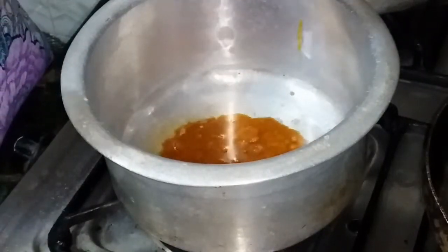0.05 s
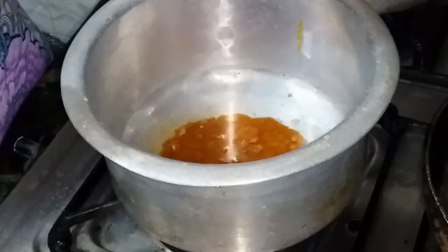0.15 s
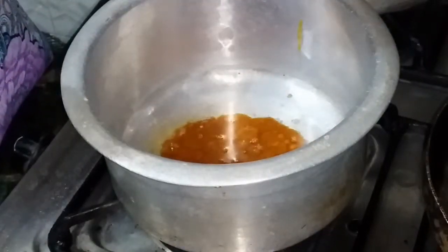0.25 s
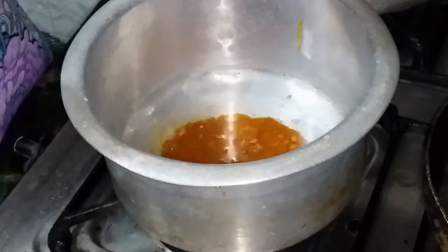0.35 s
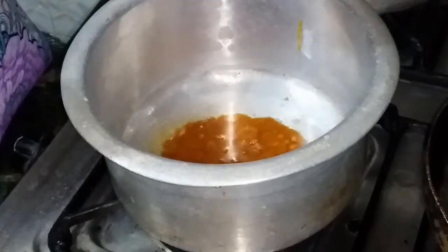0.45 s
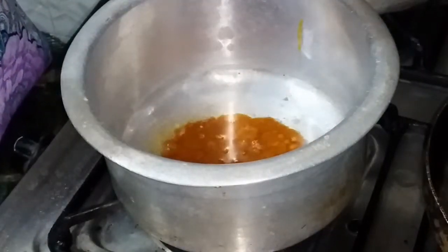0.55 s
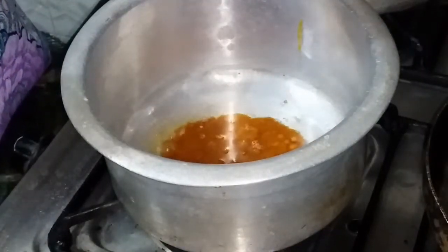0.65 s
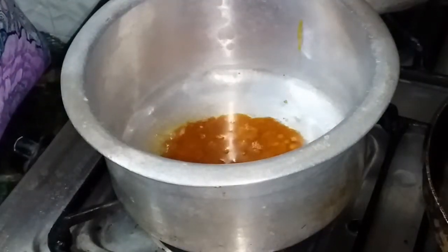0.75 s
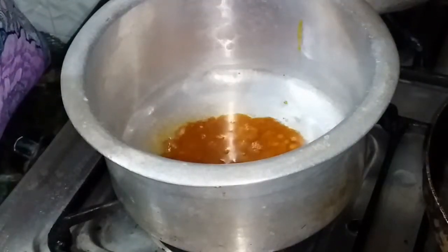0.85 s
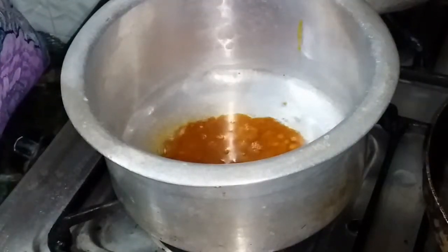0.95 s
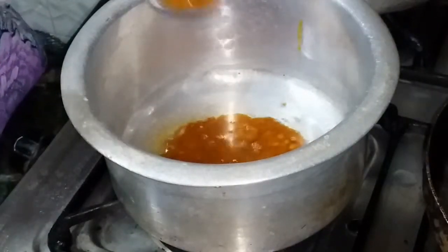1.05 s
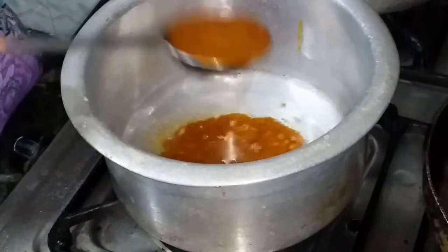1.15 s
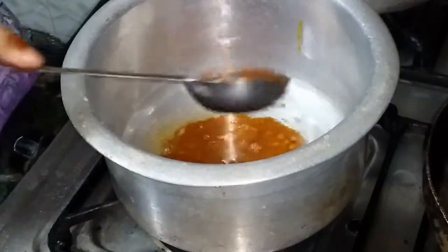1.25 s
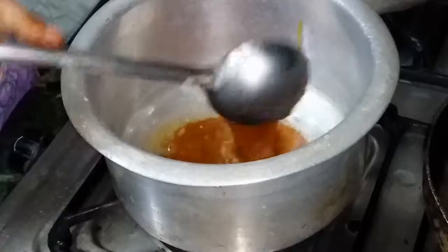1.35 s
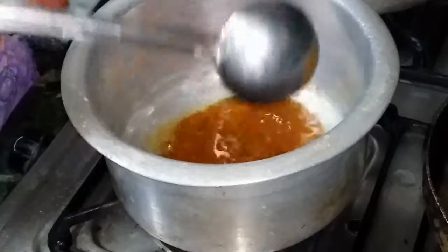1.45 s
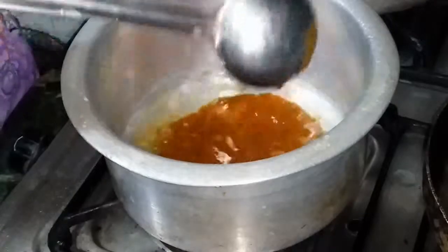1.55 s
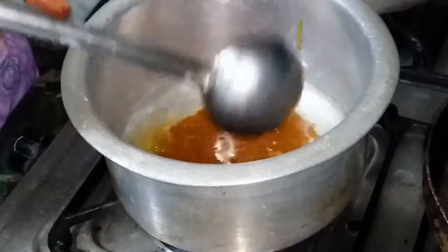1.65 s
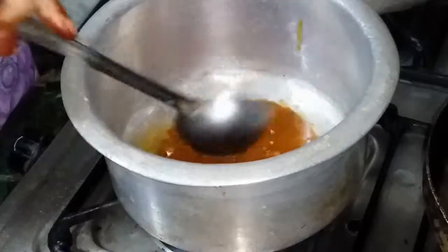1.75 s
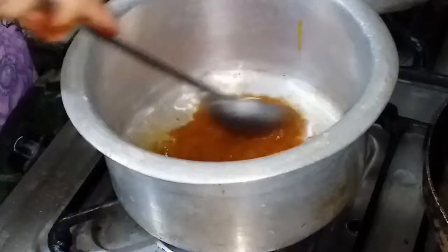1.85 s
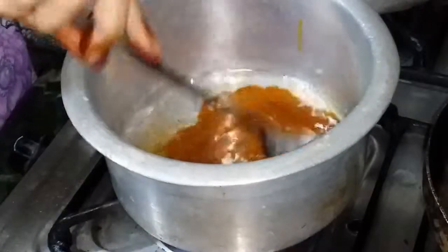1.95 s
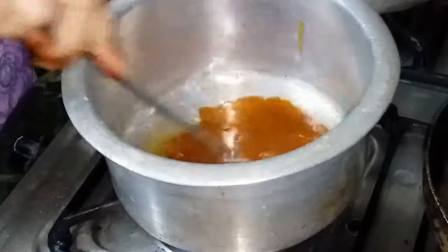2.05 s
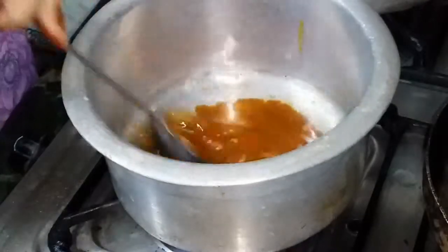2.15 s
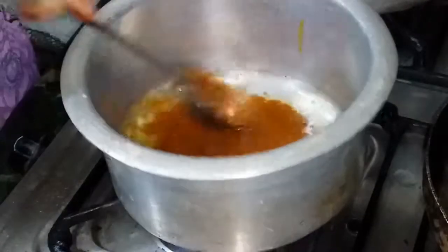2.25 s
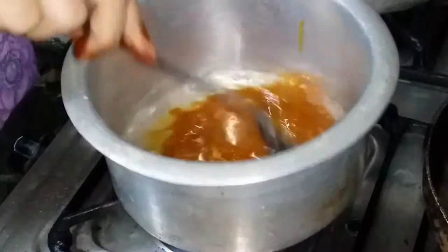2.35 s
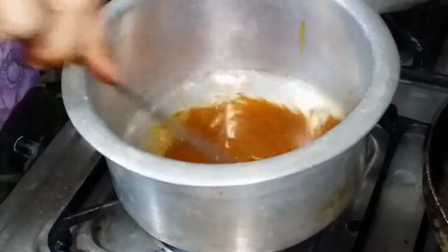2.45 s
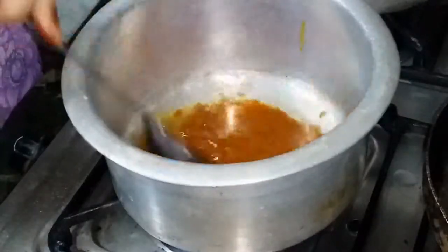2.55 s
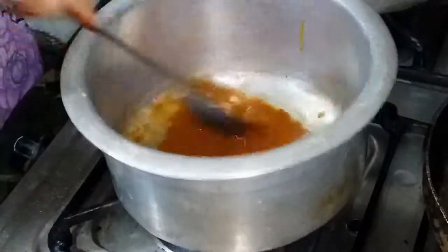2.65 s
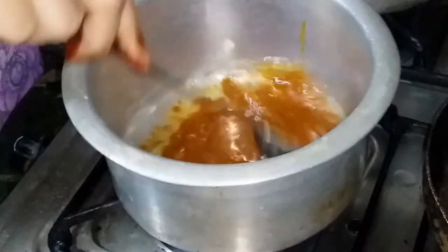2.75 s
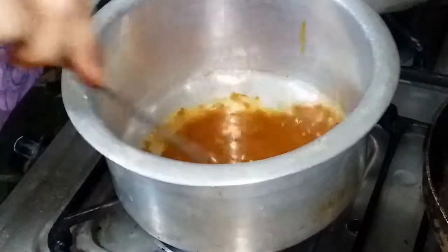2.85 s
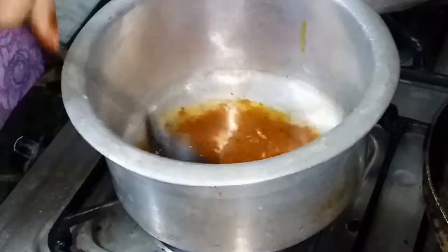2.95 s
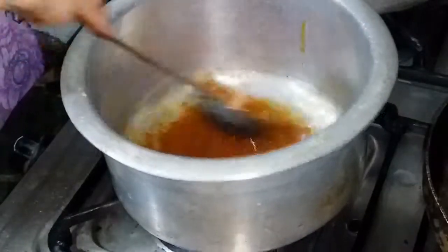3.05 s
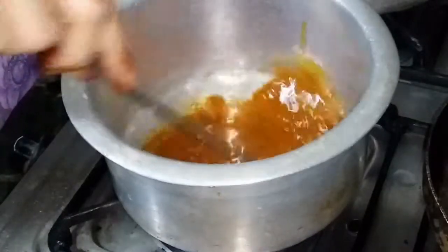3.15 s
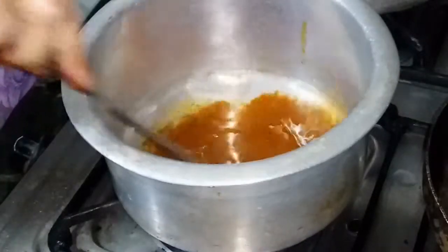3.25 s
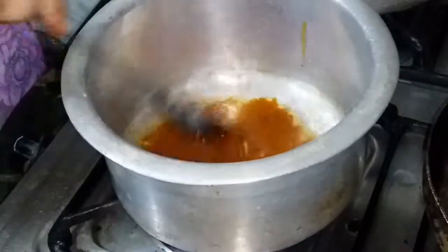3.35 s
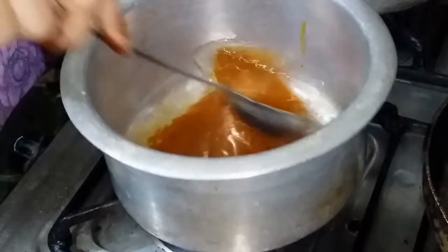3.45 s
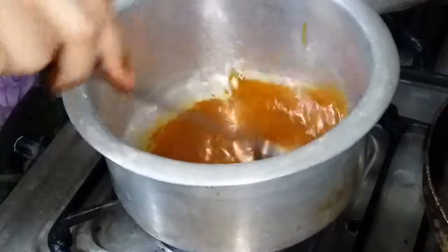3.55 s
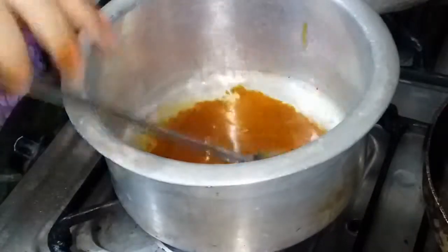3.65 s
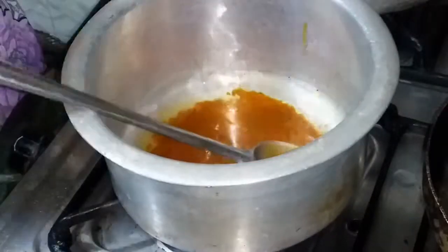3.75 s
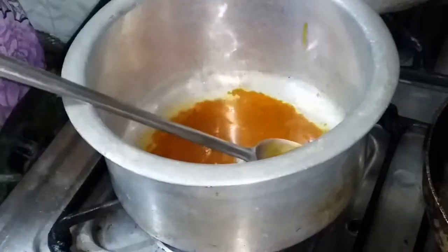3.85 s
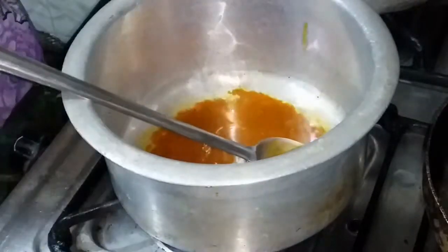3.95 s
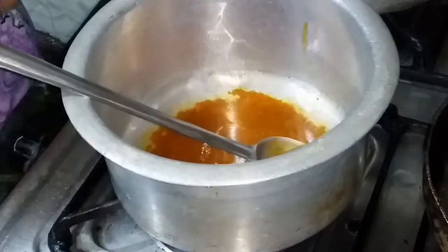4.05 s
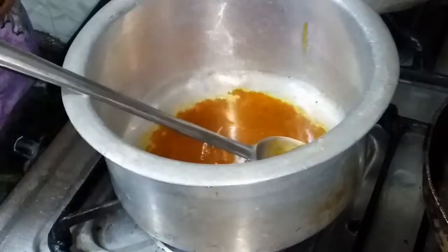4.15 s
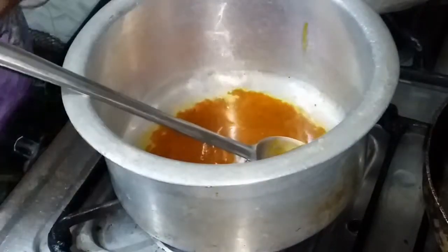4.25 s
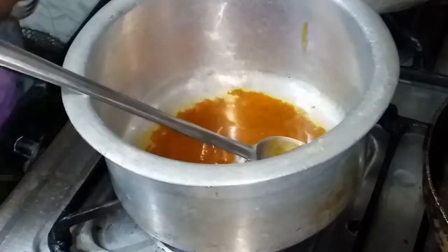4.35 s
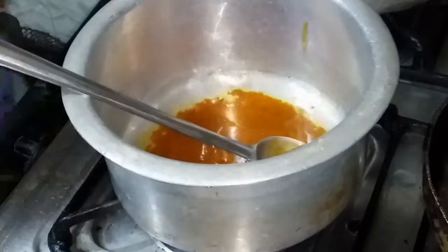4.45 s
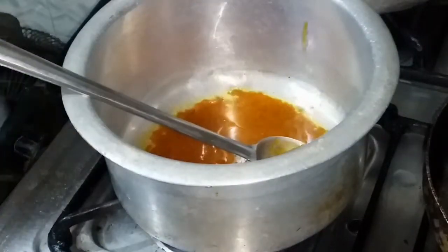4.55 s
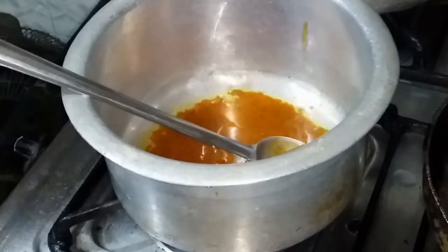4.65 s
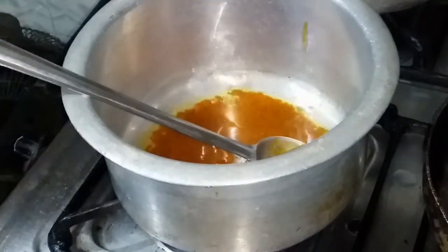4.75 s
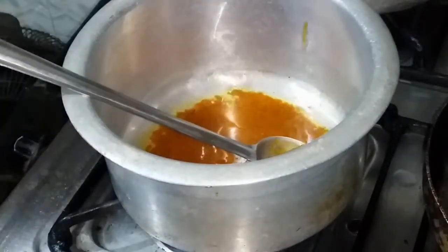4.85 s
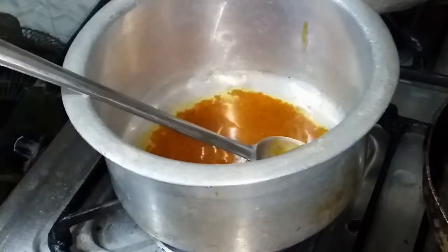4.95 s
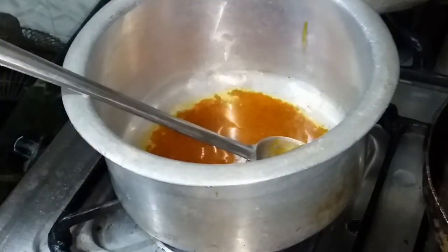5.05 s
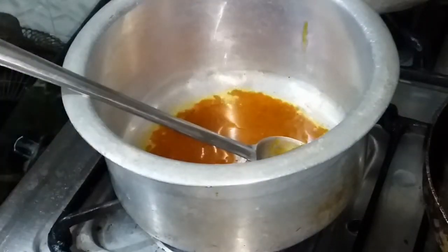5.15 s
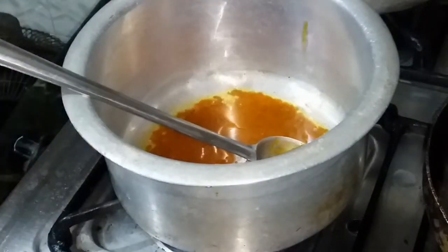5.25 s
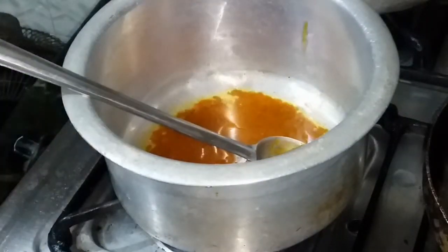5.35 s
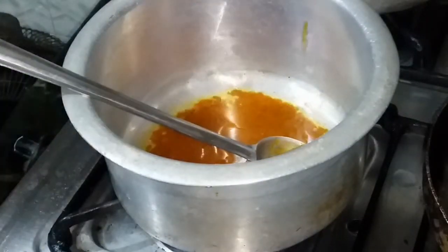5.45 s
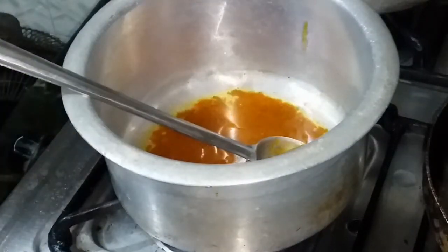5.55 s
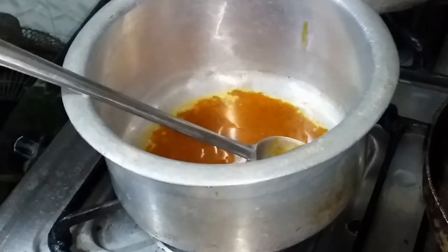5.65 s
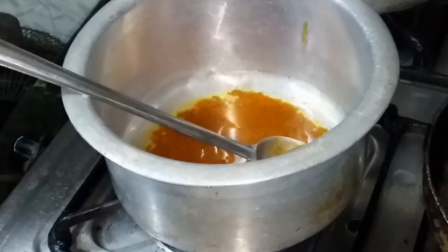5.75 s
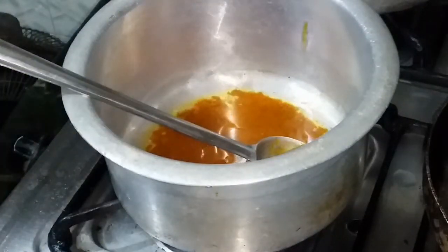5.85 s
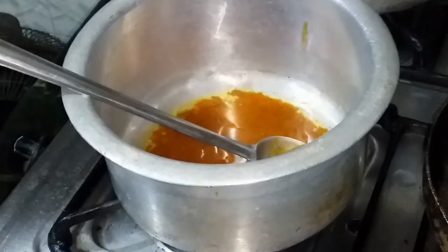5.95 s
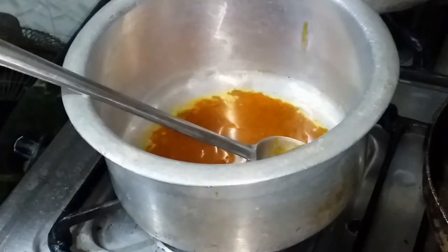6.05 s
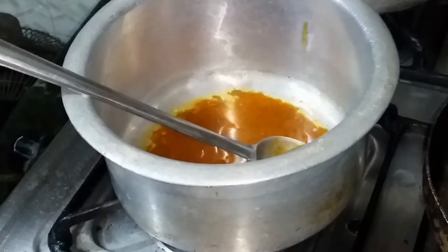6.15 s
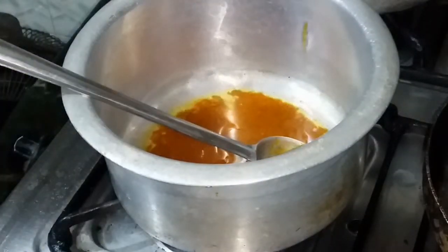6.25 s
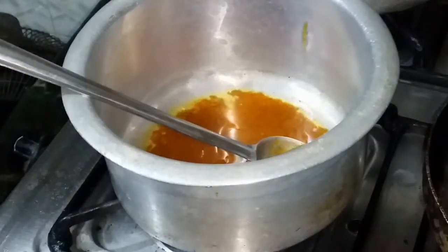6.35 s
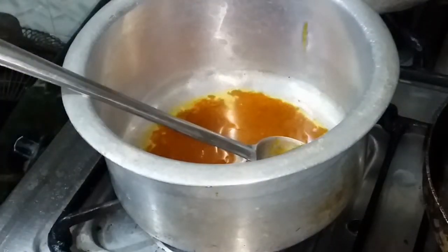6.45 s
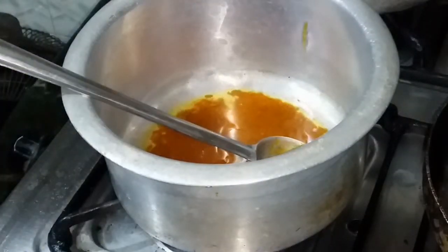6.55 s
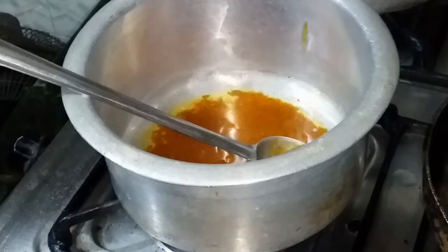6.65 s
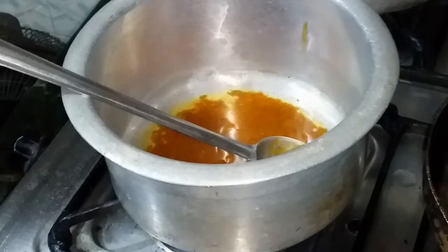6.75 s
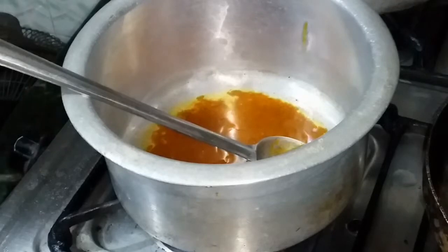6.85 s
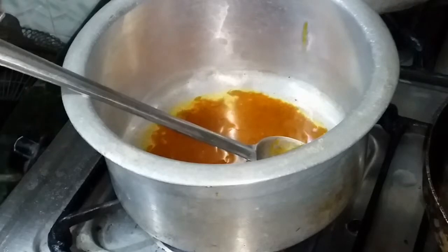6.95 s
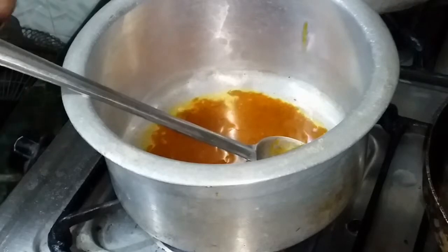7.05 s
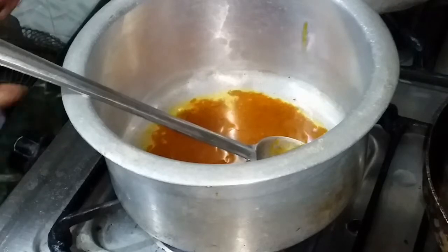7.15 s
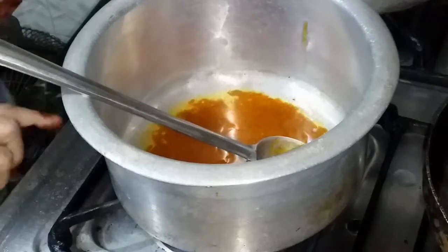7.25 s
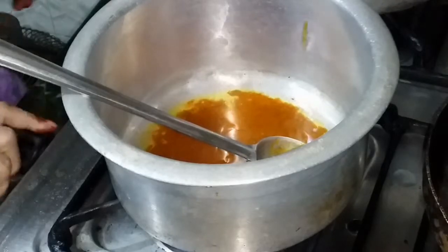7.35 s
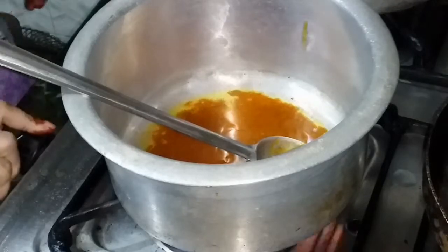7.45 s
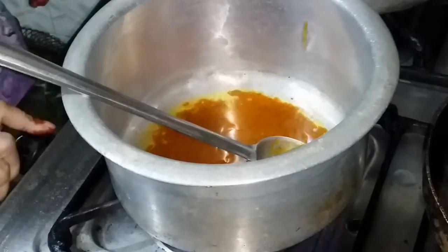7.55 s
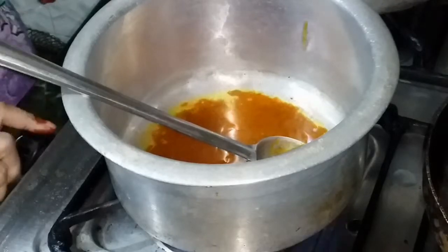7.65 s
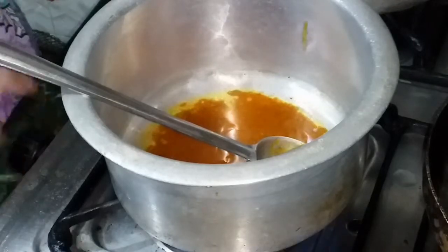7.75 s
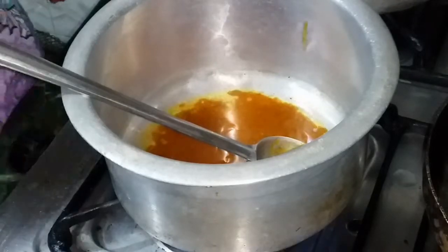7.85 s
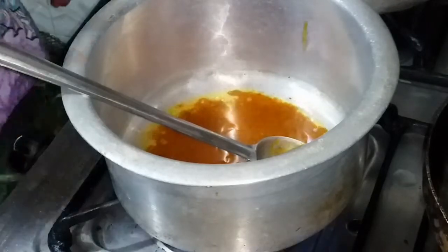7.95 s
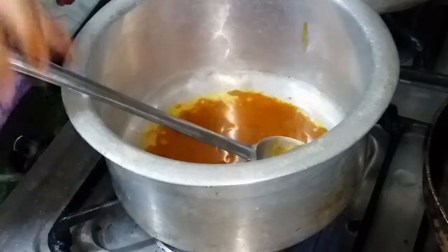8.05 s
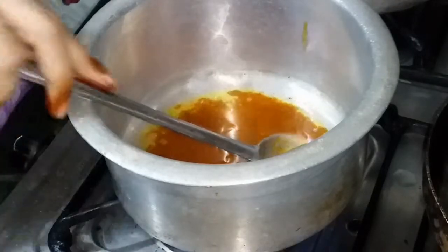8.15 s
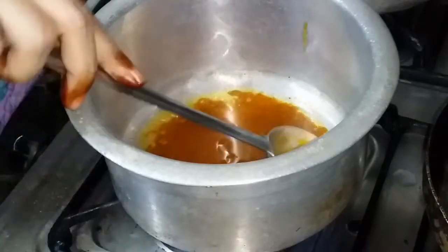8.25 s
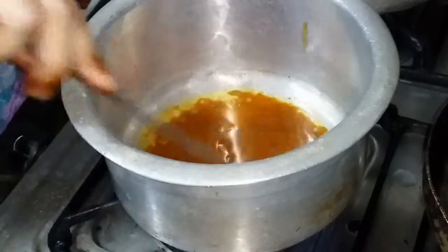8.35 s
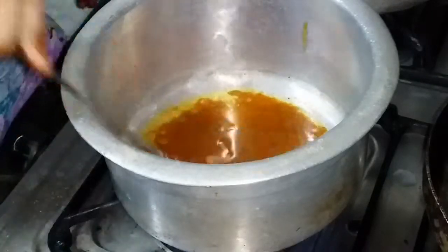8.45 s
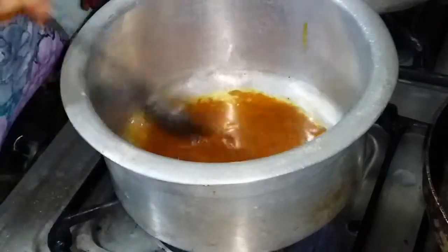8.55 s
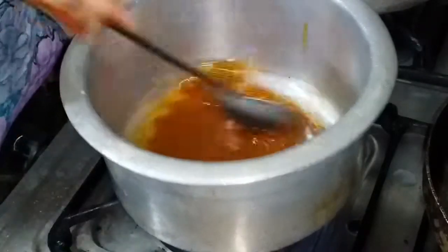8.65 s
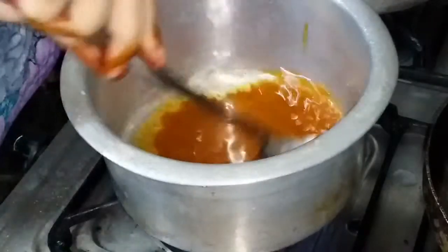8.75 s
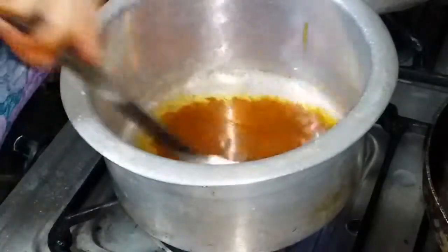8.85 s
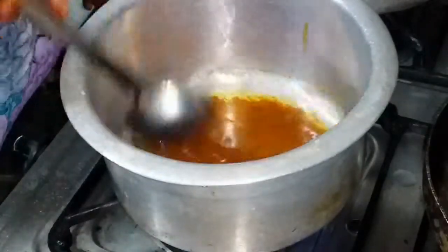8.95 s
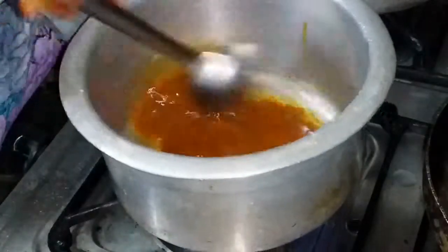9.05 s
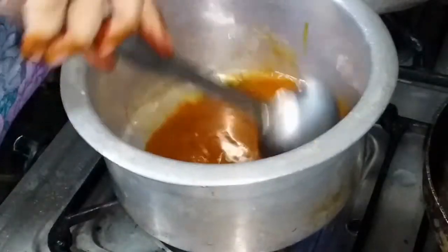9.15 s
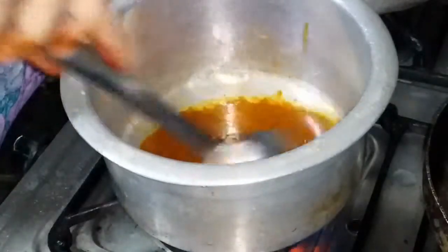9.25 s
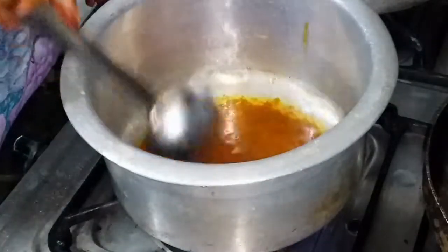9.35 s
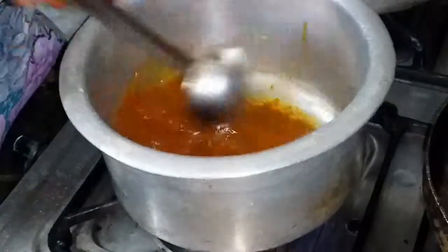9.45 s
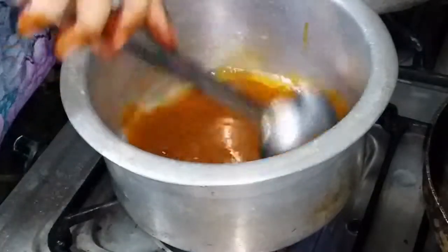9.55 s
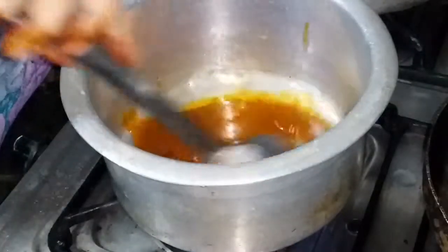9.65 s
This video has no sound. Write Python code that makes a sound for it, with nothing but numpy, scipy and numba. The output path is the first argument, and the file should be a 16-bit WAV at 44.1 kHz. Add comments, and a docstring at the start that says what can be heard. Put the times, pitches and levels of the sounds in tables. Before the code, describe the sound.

Heard close above a deep metal pot in a small, reflective kitchen. From 0 s puree fries in oil with a dense, bright sizzle, sharp ringing spits and faint burner rumble; two dull knocks come at 0.3 and 0.6 s. From 1.75 s a steel ladle shoves the paste in short lumpy scrapes, the sizzle swelling, with ringing blows on the pot at 1.9 and 2.35 s and faint high bangle tinkles between 2.1 and 3 s. Smaller clinks and rubs follow at 3.1-3.3 s, then a strong clang and rattle at 3.65 s as the ladle comes to rest. From 4 to 7.5 s the frying is quieter and finer, with small pops, a tiny tinkle near 4.7 s and soft low thuds from 6 s, firmest at 7.85 s. The sizzle rises near 7.75 s; stirring returns from 8.1 s, with scrapes and a clear clank around 8.5 s, a lighter one at 8.7 s, and strokes to the end.

```python
"""Sizzle and sharp spits: vegetable puree fries in oil in a deep metal pot in a small kitchen, phone held above.
Bubbles are clicks through damped resonators over steam noise, coloured by resonances of the air in the pot.
Dull knocks are low filtered noise; a steel ladle drags as lumpy noise and its blows and rubs drive the wall modes.
Bangles tinkle faintly as damped modes; burner and room rumble is coloured noise; hard walls echo sharp sounds."""
import sys
import numpy as np
from scipy import signal
from scipy.fft import rfft, irfft
from scipy.io import wavfile
from scipy.ndimage import uniform_filter1d
from numba import njit

SR = 44100
rng = np.random.default_rng(int(sys.argv[2]) if len(sys.argv) > 2 else 0)


def to_wav(s):
    """Save 16-bit WAV."""
    ch = np.atleast_2d(s).T  # columns
    pcm = np.round(np.clip(ch, -1, 1) * 32767)  # PCM
    wavfile.write(sys.argv[1], SR, pcm.astype(np.int16))


def volts_from_db(level):
    """Convert decibel levels to linear amplitude ratios."""
    exponent = np.asarray(level, float) / 20
    return 10 ** exponent


N = 427769
T = np.arange(N) / SR


def level(x, db):
    """Scale to an rms level."""
    return x * volts_from_db(db) / np.sqrt(np.mean(x ** 2))


def curve(points):
    """Gain over time through (time [s], level [dB]) points."""
    return volts_from_db(np.interp(T, *np.transpose(points)))


def colour(x, points, peaks=()):
    """Causal filter through (Hz, dB) points with resonance bumps, from the cepstrum of the log gain."""
    hz = np.linspace(1, SR / 2, 2049)
    points_hz, points_db = np.transpose(points)
    db = np.interp(np.log(hz), np.log(points_hz), points_db)
    for peak_hz, width_hz, lift_db in peaks:
        db = db + lift_db / (1 + (2 * (hz - peak_hz) / width_hz) ** 2)
    cepstrum = irfft(np.log(volts_from_db(db)))
    cepstrum[1:2048] *= 2
    cepstrum[2049:] = 0
    return signal.fftconvolve(x, irfft(np.exp(rfft(cepstrum))))[:N]


def ring(x, hz, t60_s):
    """One damped mode; a unit click gives a decaying sine of unit initial envelope."""
    pole = np.exp(2j * np.pi * hz / SR - np.log(1000) / (max(t60_s, .001) * SR))
    return signal.lfilter([0, pole.imag], [1, -2 * pole.real, abs(pole) ** 2], x)


def clicks(rate_hz, spread_db):
    """Clicks at random times, sizes and signs; the spread sets how far a few stand out."""
    when, size, sign = rng.random((3, int(rate_hz * N / SR)))
    size_db = spread_db * np.minimum(-np.log(1 - size), 5)
    out = np.zeros(N)
    out[(when * N).astype(int)] = volts_from_db(size_db) * np.sign(sign - .5)
    return out


def walk(rate_hz):
    """Random levels held 1 / rate and slewed twice."""
    hold = int(SR / rate_hz)
    steps = np.repeat(rng.standard_normal(N // hold + 1), hold)
    return 1.3 * uniform_filter1d(uniform_filter1d(steps, hold), hold)[:N]


def burst(at_s, t60_s, length=20000):
    """Index of a moment and a decaying envelope from it."""
    start = int(at_s * SR)
    t = np.arange(min(length, N - start)) / SR
    return start, volts_from_db(-60 * t / max(t60_s, .002))


def gesture(start_s, length_s, first_db, last_db, attack_s, fade_db_per_s):
    """Gain of one movement: it sets in, glides from one level to another and dies away."""
    t = T - start_s
    db = np.interp(t, [0, length_s], [first_db, last_db]) - fade_db_per_s * np.maximum(t - length_s, 0)
    return np.clip(t / attack_s, 0, 1) * volts_from_db(db)


# frying: (time [s], relative level [dB], treble lift before weighting by bubble pitch [dB])
FRYING_COURSE = [(0, -37, 2), (.6, -38, 2), (1.35, -38, 0), (1.75, -34.5, -1), (1.95, -35.5, 4),
                 (2.4, -33, 1.5), (2.8, -37, 4), (3.2, -38.5, 4.5), (3.6, -44, 12.5), (4.0, -44, 5.5),
                 (4.7, -46, 3.5), (5.3, -47, 3.5), (5.9, -44.5, 1), (7.4, -46, 1.5), (7.75, -40.5, 0.5),
                 (8.3, -39.5, 2), (8.9, -44.5, 8), (9.7, -46.5, 8)]
# brief flares and lulls: (middle [s], half length [s], level change [dB], treble change [dB])
FLARES_AND_LULLS = [(1.483, 0.14, -0.5, 10), (2.196, 0.026, 0, 7.5), (4.097, 0.055, -1.5, 4.5),
                    (5.1, 0.32, -0.5, 6), (5.5, 0.19, -1.5, -0.5), (5.62, .04, 9, -7), (7.03, .08, 4, -4.5),
                    (9.055, 0.057, 1, 1), (9.222, 0.073, -9, 3.5)]


def fry_curves():
    """Relative level and treble of the frying in dB, with flares and lulls."""
    s, *columns = np.transpose(FRYING_COURSE)
    out = np.array([np.interp(T, s, db) for db in columns])
    for middle_s, half_s, *change_db in FLARES_AND_LULLS:
        out = out + np.outer(change_db, np.clip(1 - np.abs(T - middle_s) / half_s, 0, 1))
    return out


# colour of the sizzle: (frequency [Hz], filter gain [dB])
SIZZLE_COLOUR = [(120, -51.5), (200, -9.5), (1300, -10.5), (1560, -11), (1940, -11), (3250, -6),
                 (3760, -7.5), (8270, -8.5), (10100, -10), (13600, -13.5), (16000, -31.5)]
# air resonances in the pot: (frequency [Hz], width [Hz], lift [dB])
AIR_MODES = [(1559, 196, 15), (2382, 90, 11.5), (3200, 247, 9.5), (4010, 930, 3.5), (4800, 80, 9),
             (5640, 230, 5.5), (7040, 91, 9), (8660, 480, 8), (13700, 200, -1)]


def frying():
    """Bubbles of every size burst in patches, each swelling and ringing a few cycles, over steam hiss."""
    fry_db, treble_db = fry_curves()
    patches, out = walk(40), 0
    steam = rng.standard_normal(N)
    for hz in 430 * 2 ** np.arange(0, 5.4, .3):
        # small bubbles come and go more than large ones
        share = np.clip(np.log2(hz / 1500) / 2, 0, 1)
        pops = clicks(hz * .06, spread_db=2.8 + .6 * share)
        bubbles = ring(ring(pops, hz, 30 / hz), hz, 12 / hz)
        # a different shift per band decorrelates the hiss
        hiss = ring(np.roll(steam, int(hz)), hz, 6 / hz)
        flicker_db = share * (1.5 * patches + treble_db) + (1 + 1.5 * share) * walk(30)
        out = out + np.sqrt(hz) * volts_from_db(flicker_db) * (level(bubbles, 0) + level(hiss, 0.66))
    return volts_from_db(fry_db) * level(colour(out, SIZZLE_COLOUR, AIR_MODES), 4.1)


# rumble colour: (frequency [Hz], filter gain [dB])
RUMBLE_COLOUR = [(18, -57), (30, -32), (87, 0), (210, 0.5), (333, -25), (454, -12), (555, -17), (637, -1.5),
                 (1200, -27.5), (1560, -19), (2640, -120)]


def kitchen():
    """Burner and room rumble: noise with a falling spectrum."""
    return level(colour(rng.standard_normal(N), RUMBLE_COLOUR), -57.5)


# large spits: (time [s], relative level [dB], pitch [Hz])
LARGE_SPITS = [(0.152, -15.5, 6740), (0.196, -22, 5030), (0.214, -21.5, 8800), (0.253, -17.5, 4700),
               (0.2792, -18, 5600), (0.399, -17, 7400), (0.488, -25, 8200), (0.6444, -17.5, 8200),
               (0.679, -24, 3250), (0.8934, -22, 8200), (0.9064, -19.5, 3420), (0.9672, -40, 3120),
               (1.2348, -23, 7700), (1.5206, -13, 3100), (1.8073, -13, 3260), (2.296, -15.5, 4150),
               (2.559, -12.5, 8300), (2.9814, -24, 3470), (4.0212, -24.5, 3250), (4.396, -26, 3350),
               (5.058, -24.5, 3250), (5.1238, -24.5, 3200), (5.19, -23.5, 8250), (5.872, -30, 3100),
               (6.0099, -31.5, 3100), (6.1808, -29.5, 3200), (6.592, -27.5, 3200), (7.091, -28, 3200),
               (7.9228, -26, 5300)]
SMALL_SPITS_PER_S, SMALL_OVER_FRYING_DB, SMALL_SPREAD_DB = 2, 12.5, 4


def spits():
    """Bubbles swell and ring at their own pitch with a spray of fizz; small ones come by chance on two air modes."""
    out = np.zeros(N)
    fry_db = fry_curves()[0]
    small = []
    for when, size, pick in rng.random((int(SMALL_SPITS_PER_S * N / SR), 3)):
        db = fry_db[int(when * N)] + SMALL_OVER_FRYING_DB + SMALL_SPREAD_DB * (2 * size - 1)
        hz = AIR_MODES[2 * (pick > .3)][0]  # first or third mode
        small.append((when * T[-1], db, hz))
    for s, db, hz in LARGE_SPITS + small:
        start, fade = burst(s, 0.089, length=4000)
        click = np.arange(len(fade)) == 0
        tone = ring(ring(click, hz, 45 / hz), hz, 15 / hz)
        tone = tone / (tone.max() + 1e-12)
        spray = level(ring(rng.standard_normal(len(fade)), 1.09 * hz, 3 / hz), -16)
        out[start:start + len(fade)] += volts_from_db(db) * (0.68 * tone + fade * spray)
    return out


# dull knocks: (time [s], peak level [dB], pitch [Hz])
DULL_KNOCKS = [(0.33, -22, 520), (0.568, -27, 480), (5.98, -39, 310), (6.249, -42, 480), (6.6, -42.5, 287),
               (6.771, -43.5, 191), (6.886, -41.5, 179), (6.991, -33, 193), (7.225, -37, 207),
               (7.471, -39.5, 162), (7.512, -33, 134), (7.725, -40, 145), (7.843, -28, 191)]
KNOCK_T60_S, KNOCK_SWELL_S = .52, 0.0037


def knocks():
    """A soft blow on something heavy: decaying noise through a low resonance, with a brighter skirt."""
    out = np.zeros(N)
    for s, db, hz in DULL_KNOCKS:
        start, fade = burst(s, KNOCK_T60_S)
        swell = np.minimum(T[:len(fade)] / KNOCK_SWELL_S, 1)
        noise = np.diff(rng.standard_normal(len(fade) + 1))
        shake = (fade + 0.71 * fade ** 5) * swell * noise
        low = ring(ring(shake, hz, 3 / hz), hz, 3 / hz)
        skirt_hz = 2.14 * hz
        skirt = ring(ring(shake * fade, skirt_hz, 3 / skirt_hz * 2.14), skirt_hz, 3 / hz)
        thud = level(low, 0) + level(skirt, -8)
        out[start:start + len(fade)] += volts_from_db(db) * thud / np.abs(thud).max()
    return out


# ladle strokes: (start [s], length [s], first level [dB], last level [dB], edge lift [dB])
LADLE_STROKES = [(1.75, .04, -39, -38, 6.5), (1.84, .12, -34, -31, 9), (2.206, 0.18, -34, -28, 9),
                 (2.596, 0.17, -35.5, -30.5, 13), (2.885, 0.18, -48.5, -33, 9),
                 (3.078, 0.059, -28, -29.5, 12), (3.255, 0.061, -27, -34.5, -7),
                 (3.407, 0.11, -53, -27, 18), (3.641, 0.18, -20, -34.5, 3), (8.1, 0.081, -42, -43.5, 17),
                 (8.268, 0.098, -44, -39.5, 7), (8.428, 0.27, -33, -29, -10), (8.877, 0.094, -40, -37, 9),
                 (9.023, 0.14, -37.5, -36.5, 11), (9.241, .11, -44, -34.5, 4), (9.422, 0.12, -41, -34, -1),
                 (9.607, 0.12, -53, -33, 8)]
# colour of the dragged paste: (frequency [Hz], filter gain [dB])
PASTE_COLOUR = [(29, -29), (50, -16), (155, -5), (282, -2), (411, -5), (497, 0), (802, -1.5), (1090, -12),
                (1540, -10.5), (3000, -15.5), (3900, -37), (6600, -120)]
STROKE_ATTACK_S, STROKE_FADE_DB_PER_S = 0.025, 139


def stirring():
    """Thick paste shoved over the hot bottom: a lumpy rumble that brightens when steel touches."""
    rough = rng.standard_normal(N) * volts_from_db(2.0 * walk(60))
    grit = level(rough + 0.42 * level(clicks(300, spread_db=-1.5), 0), 0)
    body = level(colour(grit, PASTE_COLOUR), 0)
    edge = level(ring(grit, 1420, 0.0024), -26)
    lumps = volts_from_db(1.56 * walk(25) + 1.35 * walk(110))
    out = np.zeros(N)
    for *stroke, edge_db in LADLE_STROKES:
        out += gesture(*stroke, STROKE_ATTACK_S, STROKE_FADE_DB_PER_S) * (body + volts_from_db(edge_db) * edge)
    return lumps * out


# ladle blows: (time [s], ring drive [dB], crack drive [dB]), and the wall spot of each [index]
LADLE_BLOWS = [(1.9195, -15.5, -15), (2.3605, -14.5, -16.5), (3.1408, -31.5, -29), (3.2555, -42, -29),
               (3.272, -33, -27), (3.303, -35, -37), (3.316, -22, -50), (3.6505, -14.5, -18),
               (3.6576, -31, -19.5), (3.669, -31, -35), (3.7, -30, -35), (3.755, -28.5, -31),
               (8.2851, -36, -40), (8.4223, -45, -36), (8.508, -26, -31), (8.525, -17, -18),
               (8.717, -23, -25), (8.728, -30.5, -46)]
BLOW_SPOTS = [0, 1, 1, 4, 4, 4, 4, 2, 2, 2, 4, 4, 1, 4, 4, 3, 0, 4]
# wall rubs: (start [s], length [s], first level [dB], last level [dB], ring drive [dB]), and spots [index]
WALL_RUBS = [(3.259, 0.03, -30, -32, -32), (3.308, 0.035, -30, -45, -26), (3.682, .11, -27, -31.5, -27),
             (8.327, 0.14, -58, -47, -27.5), (8.423, 0.081, -31, -23, -31), (8.53, .06, -30, -31.5, -36)]
RUB_SPOTS = [4, 4, 4, 4, 4, 4]
RUB_ATTACK_S, RUB_FADE_DB_PER_S = 0.0017, 169
# wall modes: (frequency [Hz])
WALL_HZ = [786, 1853, 1901, 2550, 2585, 2878, 3062, 3386, 3816, 3887, 4407, 4457, 4548, 4705, 5058, 5575,
           6126, 6304, 6428, 6971, 7600, 8053, 8344, 8436, 9130, 9553, 11715]
# per mode: (T60 [s], answer at spots 0, 1, 2, 3 [dB])
WALL_ANSWER = [(.75, -7, -5, -2, -9), (.5, -16, -16, -13, -3), (.6, -4, -10, 0, 4), (.5, -17, -35, -11, -9),
               (.45, -21, -25, -20, -2), (.5, -11, -30, -18, -7), (.5, -2, -9, -28, -5),
               (.22, -4, -10, -23, -14), (.3, -20, -34, -9, -17), (.6, -13, -12, -30, -14),
               (.2, -25, -6, -17, -13), (.35, -19, -27, -13, -27), (.3, -21, -13, -22, -35),
               (.22, -28, -6, -13, -19), (.3, -17, -18, -14, -15), (.25, -20, -22, -16, -11),
               (.25, -27, -28, -10, -24), (.22, -35, -30, -24, -21), (.25, -23, -35, -14, -28),
               (.22, -19, -24, -22, -27), (.22, -4, -22, -10, -15), (.25, -25, -28, -15, -23),
               (.2, -14, -26, -18, -12), (.16, -8, -18, -10, -1), (.22, -31, -27, -13, -22),
               (.17, -29, -31, -3, -27), (.15, -28, -38, -7, -30)]
# per mode, a glancing, sliding touch, spot 4: (answer [dB])
SLIDE_ANSWER = [-8, -6, 6, -9, -8, -6, -13, -14, -17, -22, -14, -13, -24, -14, -13, -9, -9, -6, -11, -14,
                -14, -16, -16, -18, -19, -23, -28]
# ladle left leaning on the wall chokes its ring: (time [s], level [dB])
WALL_CHOKE = [(3.8, 1), (4.05, -19), (7.9, -16), (8, 4)]
# lowest mode rings weaker late on: (time [s], level [dB])
LOWEST_MODE_LEVEL = [(8.56, 1), (8.62, -6.5)]


def pot():
    """Blows and chattering rubs push the wall at five spots; each mode answers each spot in its own measure."""
    grain = level(clicks(5000, spread_db=1.8), 0)
    push, crack = np.zeros((5, N)), np.zeros(N)
    rattle = volts_from_db(3.3 * walk(120))
    for (*rub, ring_db), spot in zip(WALL_RUBS, RUB_SPOTS):
        chatter = grain * rattle * gesture(*rub, RUB_ATTACK_S, RUB_FADE_DB_PER_S)
        push[spot] += volts_from_db(ring_db) * chatter
        crack += volts_from_db(-4) * chatter
    for (s, ring_db, crack_db), spot in zip(LADLE_BLOWS, BLOW_SPOTS):
        start, fade = burst(s, 0.13)
        push[spot, start] += volts_from_db(ring_db)
        # contact: bright crack and the grainy shiver of many small modes
        span = slice(start, start + len(fade))
        crack[span] += volts_from_db(crack_db) * (fade + 0.65 * fade ** 8) * grain[span]
    modes = []
    for hz, (t60_s, *spots_db), slide_db in zip(WALL_HZ, WALL_ANSWER, SLIDE_ANSWER):
        drive = volts_from_db(np.array(spots_db + [slide_db])) @ push
        modes.append(ring(drive, hz, t60_s))
    wall = curve(LOWEST_MODE_LEVEL) * modes[0] + sum(modes[1:])
    bright = colour(crack, [(300, -0.5), (1500, 3.5), (5000, 5.5), (9000, 11.5), (15000, -3.0)])
    return curve(WALL_CHOKE) * wall + bright


# bangle touches: (time [s], level [dB])
BANGLE_TOUCHES = [(2.105, -48), (2.15, -34), (2.22, -39), (2.49, -44), (2.53, -52), (2.89, -46),
                  (2.95, -39), (4.72, -44), (4.86, -54)]
# bangle modes: (frequency [Hz], level [dB], T60 [s])
BANGLE_MODES = [(11300, -4, .15), (13680, 7, 0.14), (14750, -8, .12), (15450, -5, 0.18)]


def bangles():
    """Thin glass rings on the wrist touch as it turns: clicks excite high damped modes."""
    touch = np.zeros(N)
    for s, db in BANGLE_TOUCHES:
        touch[int(s * SR)] = volts_from_db(db)
    return sum(volts_from_db(db) * ring(touch, hz, t60_s) for hz, db, t60_s in BANGLE_MODES)


def room(sharp):
    """Echo of the hard kitchen walls: convolution with decaying noise, 200 samples late."""
    _, fade = burst(0, .3)
    echo = fade * rng.standard_normal(len(fade))
    wet = signal.fftconvolve(sharp, echo / np.sqrt(np.sum(echo ** 2)))[:N]
    return volts_from_db(-11) * np.roll(wet, 200)


def scene():
    """Sum of all sources; only the sharp ones feed the room echo."""
    sharp = spits() + pot() + knocks() + bangles()
    return (sharp + room(sharp) + frying() + stirring() + kitchen())[None]


@njit
def gain_control(x, top, squeeze, attack, release):
    """Follows the loudness quickly up and slowly down, and turns loud passages down."""
    y, loudness = np.empty(len(x)), 0.
    for i in range(len(x)):
        size = abs(x[i])
        loudness += (size - loudness) * (attack if size > loudness else release)
        y[i] = x[i] * min(1., top / (loudness + 1e-9)) ** squeeze
    return y


def roll_off(x):
    """The treble ends steeply here."""
    return signal.sosfilt(signal.butter(12, 16970, fs=SR, output="sos"), x)


def record(dry):
    """Phone microphone thins the bass, dips near 10 kHz and cuts near 16 kHz; gain control, then soft clipping."""
    mic = colour(dry[0], [(25, -59), (70, -4.5), (140, -3.5), (9400, 0), (10000, -8.5), (15700, 5.5), (15900, -41)])
    attack_s, release_s = 0.035, .25
    held = gain_control(mic, volts_from_db(-29), 0.17, 1 / (attack_s * SR), 1 / (release_s * SR))
    rounded = np.tanh(1.25 * held) / 1.25
    return roll_off(rounded[None])


dry = scene()
out = record(dry)
to_wav(out)
```